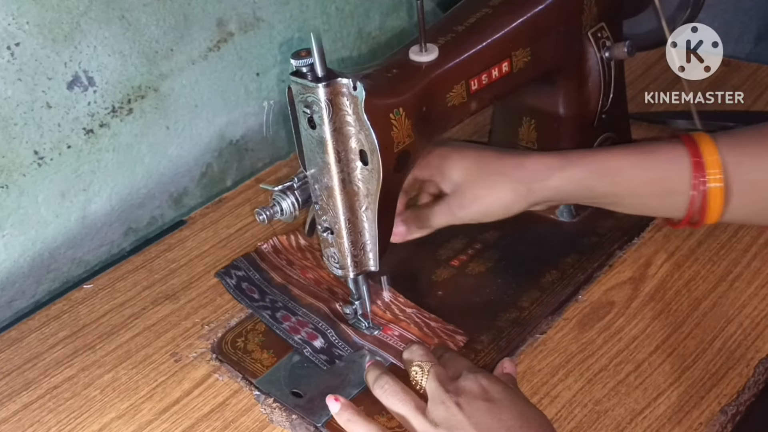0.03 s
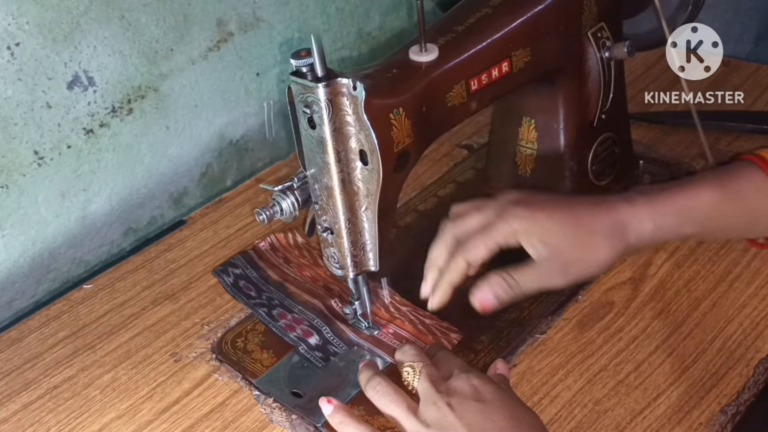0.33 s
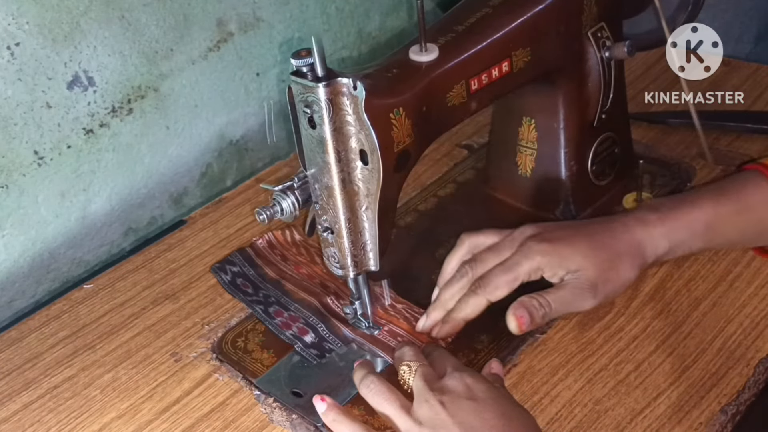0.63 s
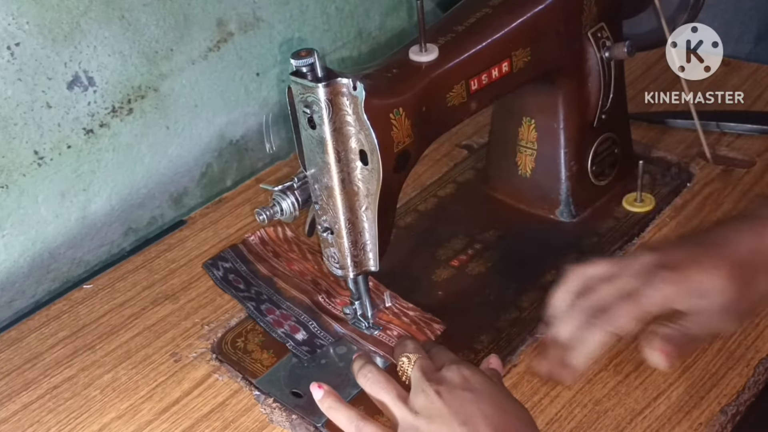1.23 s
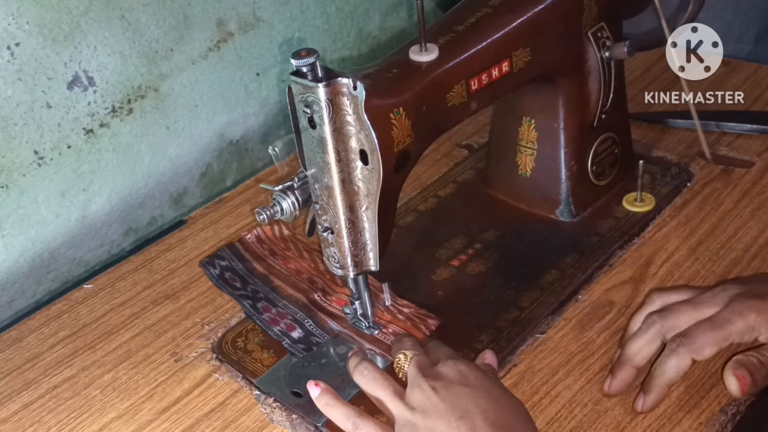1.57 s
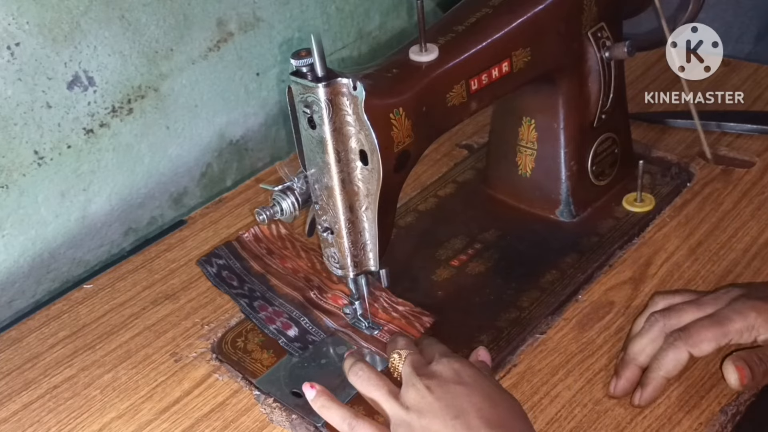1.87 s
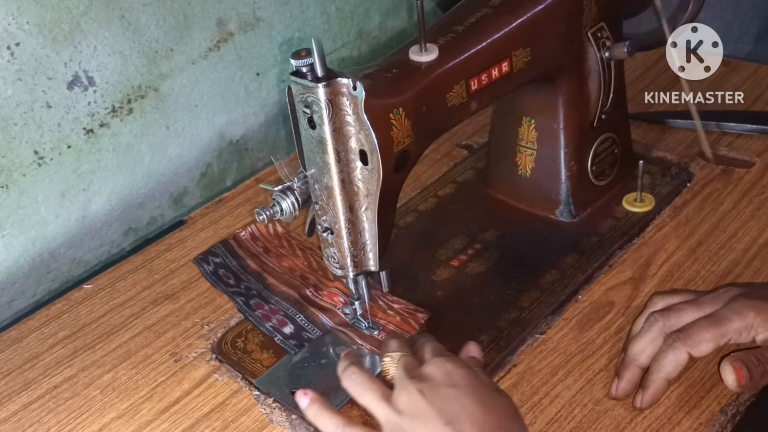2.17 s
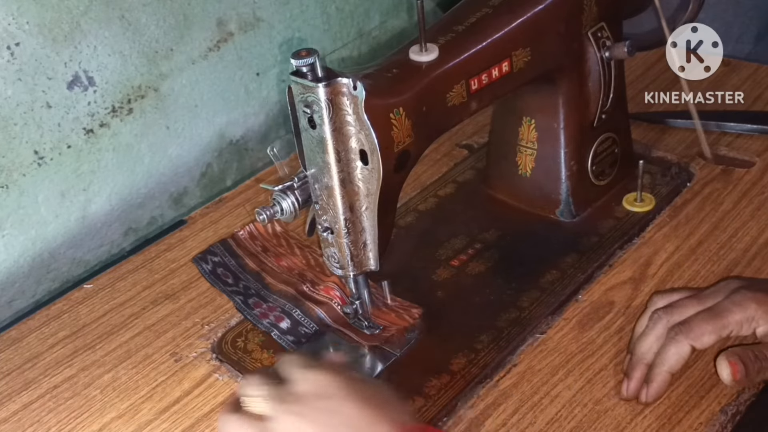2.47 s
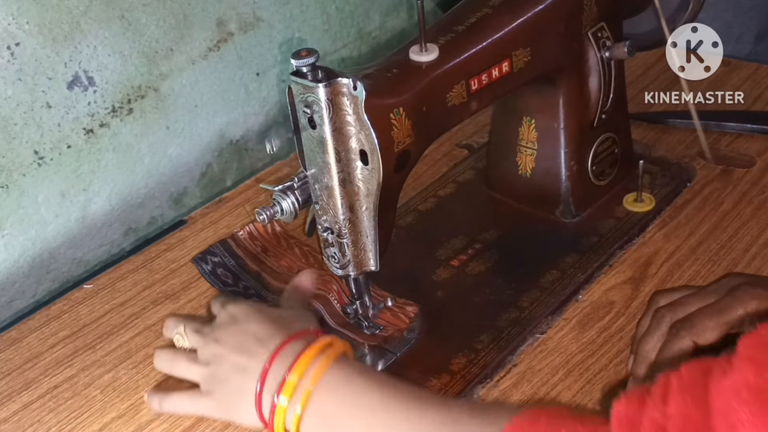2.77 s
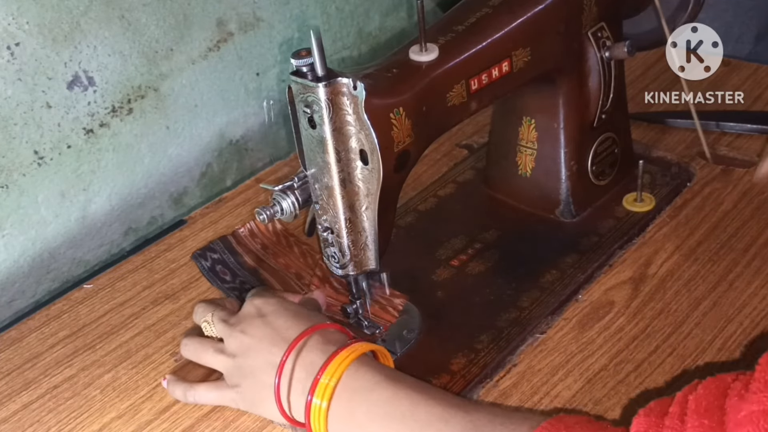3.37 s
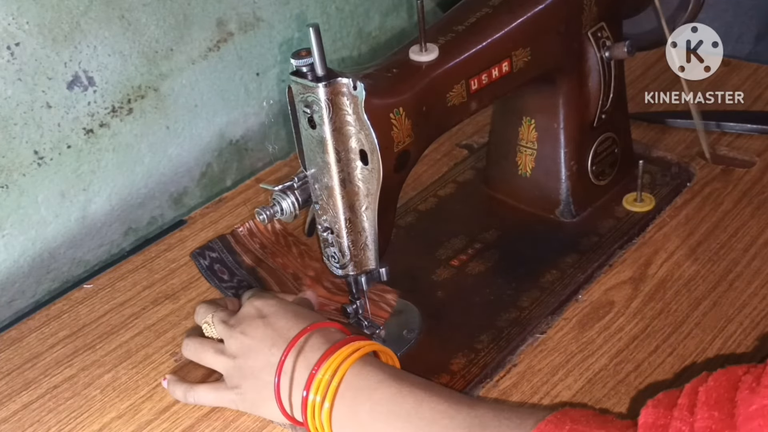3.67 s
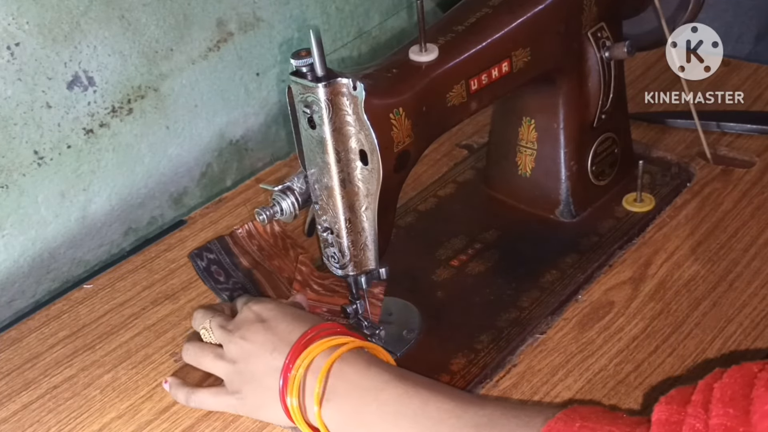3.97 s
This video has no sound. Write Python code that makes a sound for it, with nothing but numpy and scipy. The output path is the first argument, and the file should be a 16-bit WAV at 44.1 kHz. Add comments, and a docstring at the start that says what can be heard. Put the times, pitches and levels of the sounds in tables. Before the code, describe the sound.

An old sewing machine is already running and keeps going for the whole four seconds, at about six stitches a second. Each stitch is a bright steel clack with a hollow knock and a low boom from the wooden table, and the mechanism whirrs in between. Brief high squeaks come at about 1.2, 2.6, 2.8 and 3.9 seconds. The room sounds small, with faint background noise.

```python
"""An old cast-iron sewing machine on a wooden table in a small room, in widened stereo.
It is already running, about six stitches a second. Each stitch is a bright rattle of steel parts,
a beating boom of the table top and a knock of the bed plate. Shaft and shuttle whirr in between,
over a faint background noise. From just after one second on, a dry joint chirps now and then.
A limiter ducks the whirr around each clack."""
import sys
import numpy as np
from scipy import signal
from scipy.fft import irfft
from scipy.io import wavfile
from scipy.ndimage import uniform_filter1d, minimum_filter1d

SR = 44100
rng = np.random.default_rng(int(sys.argv[2]) if len(sys.argv) > 2 else 0)


def to_wav(sig):
    """Store sig (one row per channel, or 1-D mono) as 16-bit WAV at the path in sys.argv[1].

    Samples outside -1..1 are clipped; the rate is SR.
    """
    pcm = np.clip(np.atleast_2d(sig), -1, 1) * 32767
    pcm = np.round(pcm).astype(np.int16)
    wavfile.write(sys.argv[1], SR, pcm.T)  # frames by channels


N = 176400
LEFT_DELAY_S = 0.00111  # widened stereo: the left channel sounds about 1 ms after the right

# The stitches. Each row: start in seconds, then gains in dB of steel clack, frame ring, bed knock
# and table boom.
STITCHES = [(0.086, 0, 0, 4.5, 3), (0.2325, -5.2, -6, 4.2, -2), (0.3823, -1.5, -1, 3.5, 1),
            (0.5277, -2.5, -1, -3, 1), (0.6726, -0.3, 0.5, -6, 1), (0.8186, 0, 4.5, 2.5, 6),
            (0.9644, -7, -3.5, -5.5, -5), (1.1085, -2.7, -1.3, 3.5, 0.5), (1.2611, -1.6, -1, -2, -3),
            (1.4129, -1.5, -0.5, 3.5, 3), (1.562, -1, 1.2, 4, 1), (1.7149, -3.0, -1.5, 1, -1),
            (1.8698, -1.2, 1.4, 3, 2.1), (2.0215, 0.5, 4, 5, 2.5), (2.177, -3.4, -5, 1.5, -5),
            (2.3353, -1.6, 1, 1, 0.5), (2.4942, -1, 0.5, 0.8, -0.4), (2.6548, -3.5, -4.5, 3, -3),
            (2.8194, -5, -6, -9, -3.5), (2.9791, -4, -5, -3, -3.5), (3.135, -4, -4, 3.5, -5.5),
            (3.2974, -2.5, -1.5, 0.5, 0), (3.4581, 0.5, 1.3, 0, 0.8), (3.6146, -3, -4.5, 1.5, -2),
            (3.7818, -2.5, -4, -1.2, -3), (3.9507, -3.5, -2.3, 6, -1.5)]
# One stitch still ringing at the start, with the same columns.
EARLIER_STITCH = (-.062, -0.95, 0.88, 1.8, 3.2)
# Spectrum of the steel parts. Each row: frequency in Hz, relative level in dB.
STEEL_COLOUR = [(400, -52.5), (1500, -22.5), (3000, -18), (4300, -16.5), (5200, -14), (6500, -12.5),
                (7700, -9), (8500, -5.5), (9100, 0), (9900, -5.5), (10550, -3), (11200, -10),
                (13000, -14.5), (14800, -15), (16000, -30)]
# How alike the two channels are. Each row: frequency in Hz, coherence from 0 to 1.
COHERENCE = [(50, 0.47), (150, 0.98), (650, 0.86), (900, 0.25), (2200, 0.13), (4000, 0.071), (16000, 0.033)]


def amp(db):
    """Turns decibels into amplitude."""
    return 10 ** (np.asarray(db) / 20)


def unit(x):
    """Scales to an rms of one."""
    return x / np.sqrt(np.mean(x ** 2) + 1e-20)


def read(points, hz):
    """Reads a table on a log-frequency axis."""
    f, value = np.transpose(points)
    return np.interp(np.log(hz + 1), np.log(f + 1), value)


def add(mix, start_s, sound):
    """Mixes a stereo sound in at a time, which may lie before the start."""
    at = round(start_s * SR)
    sound = sound[:, max(-at, 0):]
    part = mix[:, max(at, 0):][:, :sound.shape[1]]
    part += sound[:, :part.shape[1]]


def sides(hz):
    """Gain of the left and right channel at each frequency."""
    # Stereo balance. Each row: frequency in Hz, left minus right in dB.
    balance = [(100, 1.7), (450, 3.5), (620, 1), (1200, 2.5), (1600, 3), (4000, 1.5), (7500, 2),
               (9100, 6.5), (9800, 1), (12000, -0.5), (15000, 0.5)]
    lean_db = read(balance, np.atleast_1d(hz)) / 2
    return amp([lean_db, -lean_db])


def noise(colour, size):
    """Coloured stereo noise, partly alike in the two channels."""
    hz = np.fft.rfftfreq(size, 1 / SR)
    left, unrelated = np.exp(2j * np.pi * rng.random((2, len(hz))))
    coherence = read(COHERENCE, hz)
    right = coherence * left + np.sqrt(1 - coherence ** 2) * unrelated
    return unit(irfft(np.array([left, right]) * sides(hz) * amp(read(colour, hz)), size))


def ring(colour, t60, size=16384):
    """Response of countless dense modes, of energy one; t60 is in seconds, or a table by frequency."""
    out = noise(colour, size)
    if np.isscalar(t60):
        out = out * amp(-60 * np.arange(size) / SR / t60)
    else:
        hz, t, spectrum = signal.stft(out, SR, nperseg=512)
        decay = amp(-60 * t / read(t60, hz)[:, None])
        out = signal.istft(spectrum * decay, SR, nperseg=512)[1]
    return unit(out) / np.sqrt(size)


def play(force, response):
    """Sends a mono force through a stereo response."""
    return signal.fftconvolve(force[None], response, axes=1)


def rattle(size=2048, chatter_per_s=1700, hold_s=0.0089, fade_s=0.01, jitter_s=0.0005):
    """Force of one stitch: a few hard contacts amid a short chatter."""
    # Loose parts that meet in every stitch. Each row: delay in seconds, relative strength in dB.
    contacts = [(.0003, 0), (.003, -1), (.0062, -2.5), (.0102, 1)]
    t = np.arange(size) / SR
    force = rng.standard_normal(size) * (rng.random(size) < chatter_per_s / SR)
    force *= amp(-9) * np.exp(-np.maximum(t - hold_s, 0) / fade_s)
    for delay, db in contacts:
        at = int(abs(delay + jitter_s * rng.standard_normal()) * SR) % size
        force[at] += amp(db) * rng.choice([-1, 1])
    return force / np.linalg.norm(force)


def clacks(size=16384, repeat_share=0.46):
    """Each rattle rings the steel parts, never at quite the same spots, the iron frame and the room."""
    # Spectrum of the iron frame. Each row: frequency in Hz, relative level in dB.
    frame_colour = [(100, -12.5), (250, -22), (350, -11), (450, -8.5), (520, -10), (620, 0), (760, -8.5),
                    (1000, -14), (1500, -8.5), (2200, -9), (3500, -19), (8000, -22.5)]
    # Decay of the small room. Each row: frequency in Hz, T60 in seconds.
    room_t60 = [(200, 0.59), (1000, 0.22), (4000, .22), (9000, 0.14), (15000, 0.16)]
    # Modes of the head and arm. Each row: frequency in Hz, relative level in dB, T60 in seconds.
    head_modes = [(884, -48.5, 0.31), (1236, -36.5, 0.11), (1630, -51, 0.16), (2130, -47, 0.14),
                  (2350, -45.5, 0.16), (2693, -44.5, 0.14), (3064, -30.5, 0.13), (4470, -35, 0.13),
                  (5120, -39, .12), (5150, -30.5, 0.078), (5800, -41, .1), (5974, -31.5, .12),
                  (8920, -48, 0.12), (10300, -23, 0.076), (12500, -31, .1), (13200, -28.5, 0.17)]
    t, out = np.arange(size) / SR, np.zeros((2, N))
    head = 0
    for hz, db, t60 in head_modes:
        side_phase = (1 - read(COHERENCE, hz)) * rng.random((2, 1))
        head += sides(hz) * amp(db - 60 * t / t60) * np.sin(2 * np.pi * (hz * t + side_phase))
    steel_room, frame_room = ring(STEEL_COLOUR, room_t60), ring(frame_colour, room_t60)
    for start, steel_db, frame_db, _, _ in [EARLIER_STITCH, *STITCHES]:
        fresh_room = ring(STEEL_COLOUR, room_t60)
        tail = np.sqrt(repeat_share) * steel_room + np.sqrt(1 - repeat_share) * fresh_room
        steel = amp(15) * ring(STEEL_COLOUR, t60=0.018) + amp(13.5) * tail
        frame = ring(frame_colour, t60=0.061) + amp(-0.5) * frame_room + head
        clack = play(rattle(), amp(steel_db) * steel + amp(frame_db) * frame)
        add(out, start - LEFT_DELAY_S / 2, clack)
    return out


def table_booms(delay_s=0.0008, pitch_spread=0.0044):
    """Each stitch pushes the table top, whose two close modes swell and beat."""
    # Table top modes. Each row: frequency in Hz, relative level in dB, T60 in seconds, sign.
    table_modes = [(130.9, -33.5, 0.42, 1), (143.5, -35.5, 0.4, -1), (101, -58, 0.27, 1)]
    t, out = np.arange(SR // 2) / SR, np.zeros((2, N))
    for start, _, _, _, boom_db in [EARLIER_STITCH, *STITCHES]:
        tune = 1 + pitch_spread * rng.standard_normal()
        boom = sum(sign * sides(hz) * amp(db - 60 * t / t60) * np.sin(2 * np.pi * hz * tune * t)
                   for hz, db, t60, sign in table_modes)
        add(out, start + delay_s, amp(boom_db) * boom)
    return out


def bed_knocks(size=12000, thrust_s=0.00084, second_db=-14, rise_s=0.0033, pitch_spread=0.0055):
    """The needle bar's thrust makes the bed plate knock, and a softer push knocks it again in mid-stitch."""
    # Hollow modes of the bed plate. Each row: frequency in Hz, relative level in dB, T60 in seconds.
    bed_modes = [(448, -50.5, 0.24), (565.6, -36, 0.2), (614.2, -29.5, 0.13), (670, -43, 0.061)]
    t, out = np.arange(size) / SR, np.zeros((2, N))
    attack = np.minimum(t / rise_s, 1)
    for start, _, _, thrust_db, _ in [EARLIER_STITCH, *STITCHES]:
        second_s = 0.09 + 0.00398 * rng.standard_normal()  # in mid-stitch
        for delay, strength_db in (thrust_s, thrust_db), (second_s, second_db):
            knock = 0
            for hz, db, t60 in bed_modes:
                tune = 1 + pitch_spread * rng.standard_normal()
                phase = 2 * np.pi * (hz * tune * t + rng.random())
                knock += sides(hz) * amp(db - 60 * t / t60) * np.sin(phase)
            add(out, start + delay, amp(strength_db) * attack * knock)
    return out


def moving_part(colour, turn_levels, ticks_per_s, spread_db):
    """A moving part ticks finely at three spots, its level following the turn of the shaft."""
    starts = [row[0] for row in [EARLIER_STITCH, *STITCHES]]
    starts.append(2 * starts[-1] - starts[-2])  # completes the last turn
    turns = np.interp(np.arange(N) / SR, starts, np.arange(len(starts)))
    effort_db = 0.7 * rng.standard_normal(len(starts))[turns.astype(int)]
    ticks = (rng.random(N) < ticks_per_s / SR) * rng.choice([-1, 1], N)
    ticks = ticks * amp(spread_db * np.minimum(rng.exponential(1, N), 3))
    ticks *= amp(np.interp(turns % 1, *np.transpose(turn_levels)) + effort_db)
    spots, out = rng.integers(0, 3, N), np.zeros((2, N))
    for spot in range(3):
        direct, room = ring(colour, t60=0.011), ring(colour, t60=0.17)
        out += play(ticks * (spots == spot), direct + amp(-5.5) * room)[:, :N]
    return unit(out)


def whirr():
    """The shaft whirrs throughout; the shuttle rattles as it swings back before each stitch."""
    # Spectra of the two parts. Each row: frequency in Hz, relative level in dB.
    shaft_colour = [(60, -20), (150, -1.5), (250, -13.5), (450, 8.5), (620, -13), (850, -10), (1300, -9),
                    (2100, -13), (3500, -7.5), (6000, -8.5), (9200, 2.5), (11500, -6), (15000, -31)]
    shuttle_colour = [(120, -39), (260, -14), (450, 2), (610, 5), (800, -0.5), (1300, 1), (2100, 1),
                      (3200, -10.5), (6000, -9.5), (12000, -26)]
    # Their loudness through one turn. Each row: share of the turn, gain in dB.
    shaft_turn = [(0, -7), (.2, 7), (.45, -2), (.7, -4), (.9, -1), (1, 6.5)]
    shuttle_turn = [(0, -4.5), (.35, -6.5), (.57, -1), (.68, 1.5), (.78, 0.5), (.89, -4), (.97, 0), (1, -4)]
    shaft = moving_part(shaft_colour, shaft_turn, ticks_per_s=2500, spread_db=1.5)
    shuttle = moving_part(shuttle_colour, shuttle_turn, ticks_per_s=700, spread_db=3.5)
    return amp(-40) * shaft + amp(-45.5) * shuttle


def background():
    """A faint, steady rumble and hiss lies under the machine."""
    # Spectrum of the noise floor. Each row: frequency in Hz, relative level in dB.
    floor_colour = [(20, -10), (45, 5), (65, -26), (100, 10.5), (200, 1), (500, -30), (2000, -3.5),
                    (8000, -24), (16000, -32)]
    return amp(-54.5) * noise(floor_colour, N)


def chirps(size=6000, rise_s=0.003, t60=0.13, waver_depth=0.011, overtone_ratio=1.58):
    """A dry joint rubs briefly and sings at a wavering high pitch with one overtone."""
    # Rubs of the joint. Each row: start in seconds, length in seconds (the fade begins halfway),
    # pitch in Hz, level in dB.
    rubs = [(1.210, 0.038, 9370, -31.5), (1.213, 0.027, 9800, -38), (2.592, 0.014, 8850, -25.5),
            (2.770, 0.016, 8970, -27.5), (3.869, 0.049, 8900, -34.5), (3.919, 0.047, 9850, -30)]
    t, out = np.arange(size) / SR, np.zeros((2, N))
    for start, length, hz, db in rubs:
        waver = unit(uniform_filter1d(rng.standard_normal((2, size)), size=40))
        phase = 2 * np.pi * np.cumsum(hz * (1 + waver_depth * waver), axis=1) / SR
        level = np.minimum(t / rise_s, 1) * amp(db - 60 * np.maximum(t - length / 2, 0) / t60)
        tone = sides(hz) * (np.sin(phase) + amp(-11) * np.sin(overtone_ratio * phase))
        friction = amp(-9) * noise(STEEL_COLOUR, size)
        add(out, start, level * (tone + friction))
    return out


def scene():
    """The machine's own sounds hold little deep bass; a short delay of the left channel widens the stereo."""
    low_cut = signal.butter(3, 100, "high", fs=SR, output="sos")
    metal = signal.sosfilt(low_cut, clacks() + bed_knocks() + whirr() + chirps())
    left, right = metal + table_booms() + background()
    late_left = np.pad(left, (round(LEFT_DELAY_S * SR), 0))[:N]
    return np.array([late_left, right])


def record(dry):
    """A look-ahead limiter ducks before each clack, rounds its peaks and recovers; a low-pass follows."""
    threshold_db, cut_share, recover_db_per_s = -24, 0.52, 88
    look_ahead_s, ceiling, top_hz = 0.017, 0.6, 15700
    ahead = round(look_ahead_s * SR)
    power_db = 10 * np.log10(abs(uniform_filter1d((dry ** 2).mean(0), size=300)) + 1e-12)
    wanted_db = cut_share * np.maximum(power_db - threshold_db, 0)
    held_db = -minimum_filter1d(-wanted_db, 2 * ahead + 1, origin=-(ahead // 2))  # deepest cut nearby
    recovery_db = np.arange(N) * recover_db_per_s / SR
    cut_db = np.maximum.accumulate(held_db + recovery_db) - recovery_db
    ducked = dry * amp(-uniform_filter1d(cut_db, ahead))
    peak = abs(signal.hilbert(ducked)) / ceiling
    rounded = ducked / (1 + peak ** 4) ** 0.25
    low_pass = signal.firwin(201, top_hz, window=("kaiser", 8), fs=SR)
    return signal.oaconvolve(rounded, low_pass[None], "same")


dry = scene()
out = record(dry)
to_wav(out)
```